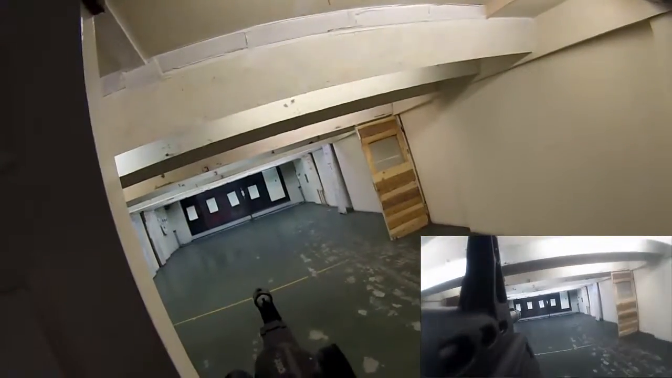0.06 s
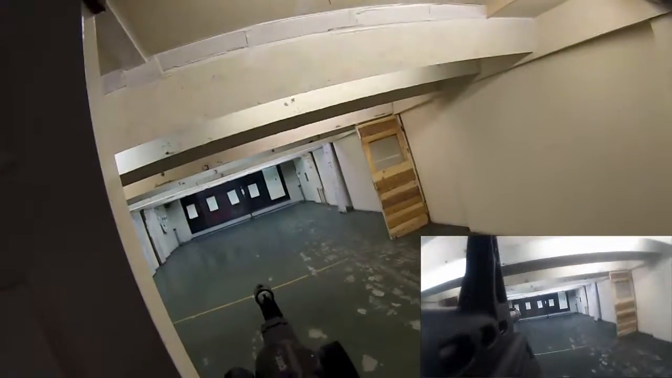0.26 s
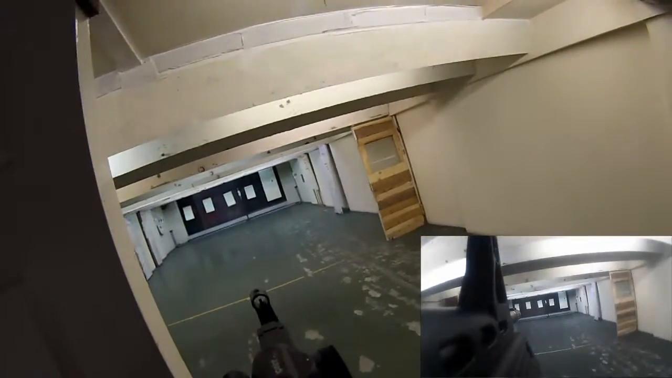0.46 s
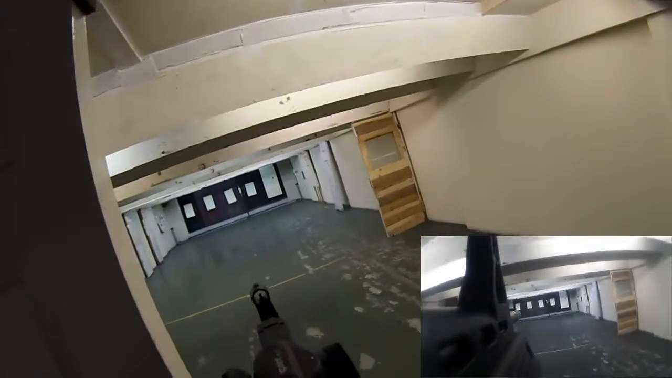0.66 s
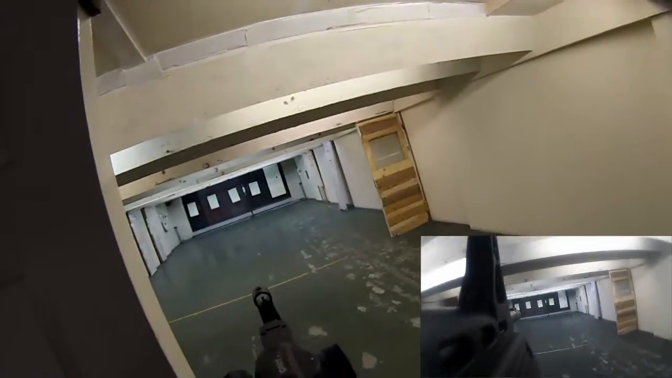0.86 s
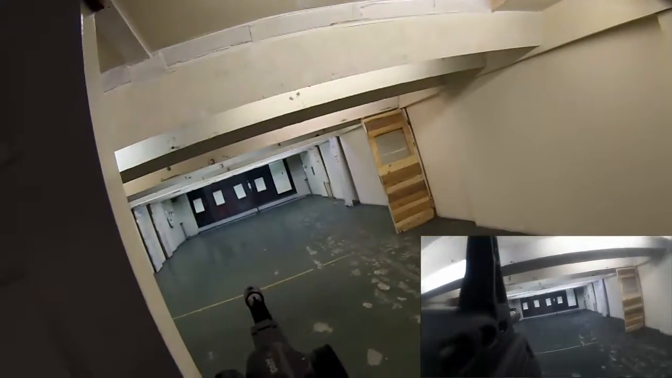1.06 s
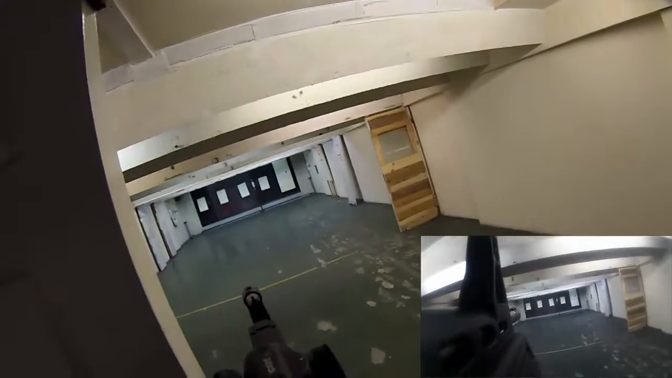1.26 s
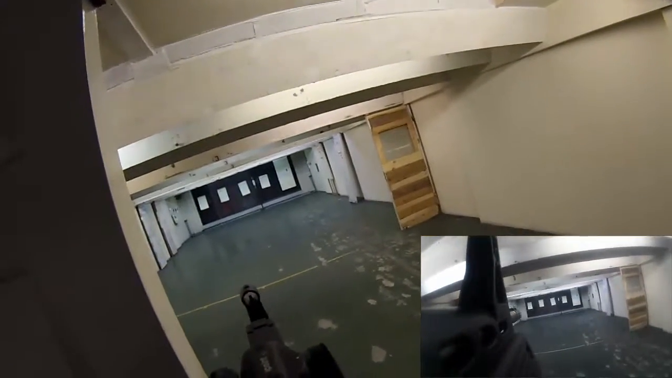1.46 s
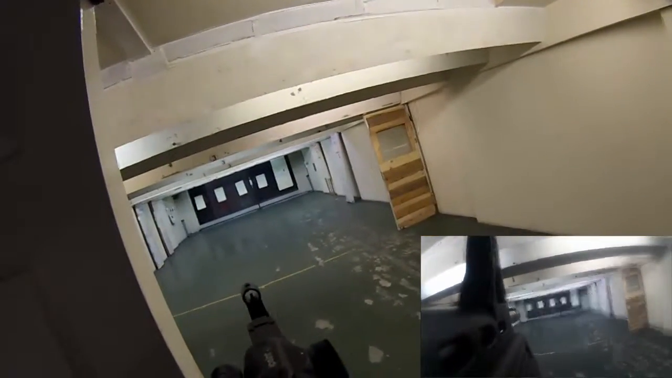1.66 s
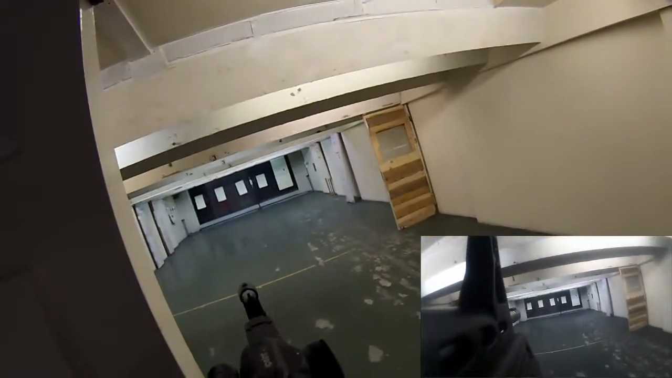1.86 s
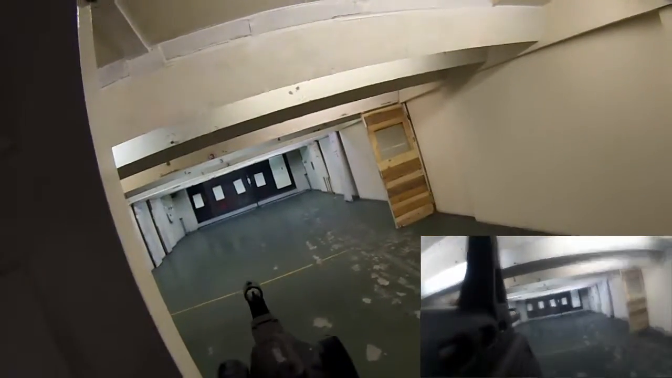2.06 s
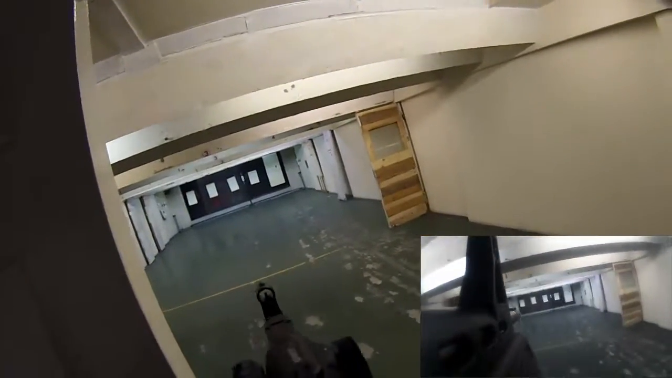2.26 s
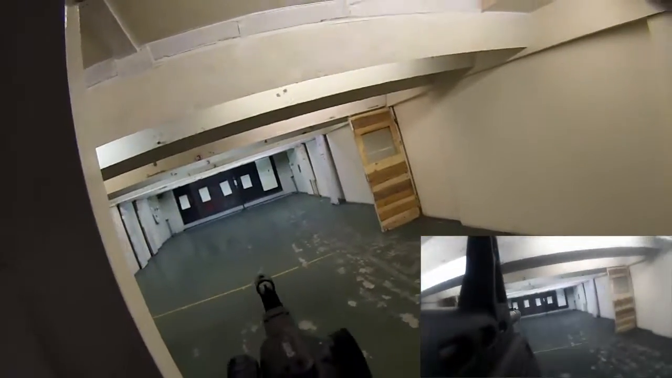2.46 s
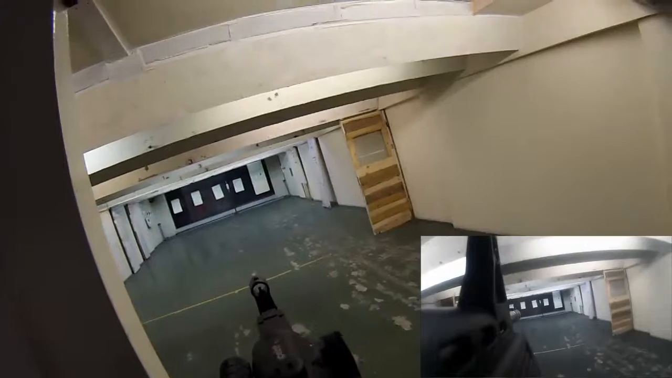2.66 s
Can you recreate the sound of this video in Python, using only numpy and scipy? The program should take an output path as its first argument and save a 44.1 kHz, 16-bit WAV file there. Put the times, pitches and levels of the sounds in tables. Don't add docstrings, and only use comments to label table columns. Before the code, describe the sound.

Four rifle shots fired in a reverberant indoor range, two spaced apart, then a heavier pair close together; sharp clicks precede them, echoes slap back, heard through a small overloaded head-worn microphone.

```python
import sys
import numpy as np
from scipy import signal
from scipy.io import wavfile
from scipy.ndimage import uniform_filter1d

SR = 44100
rng = np.random.default_rng(int(sys.argv[2]) if len(sys.argv) > 2 else 0)


def volts_from_decibels(level):
    exponent = np.asarray(level, float) / 20
    return 10 ** exponent


def dump_mix(stems):
    frames = np.atleast_2d(stems).T
    limited = np.clip(frames, -1, 1)
    pcm = np.round(limited * 32767).astype(np.int16)
    wavfile.write(sys.argv[1], SR, pcm)


N = 121275
DUCK_DB = 11

# t/s, level/dB, gain recovery/s, pressure thump level/dB
SHOTS = [
    (.201, 0, 0.19, -21.5),
    (0.7698, -1, 0.19, -20.5),
    (1.6983, 1, 0.27, -11.5),
    (2.08, 0.5, 0.26, -14.5),
]


def read(points, hz):
    f, value = np.transpose(points)
    return np.interp(np.log(hz + 1), np.log(f + 1), value)


def evened(x):
    return x / np.sqrt(np.mean(x ** 2) + 1e-20)


def add(mix, s, sound):
    part = mix[round(s * SR):][:len(sound)]
    part += sound[:len(part)]


def noise(colour_db, count, size=512):
    hop = size // 4
    frames = count // hop + 5
    hz = np.fft.rfftfreq(size, 1 / SR)[:, None]
    real, imaginary = rng.standard_normal((frames, len(hz), 2)).T
    t = np.arange(frames) * hop / SR
    spectra = (real + 1j * imaginary) * volts_from_decibels(colour_db(hz, t))
    return signal.istft(spectra, nperseg=size, noverlap=size - hop)[1][:count]


def air():
    # f/Hz, level/dB per Hz
    air_colour = [(15, -32), (25, -9), (113, -10.5), (155, 4.5), (231, -22), (293, -9), (991, -4.5),
                  (1470, -18), (14000, -31.5)]
    sound = noise(lambda hz, t: read(air_colour, hz) + 0 * t, count=N, size=1024)
    return volts_from_decibels(-60) * evened(sound)


def ticks():
    # t/s, peak level/dB, f/Hz, t60/s
    knocks = [
        (.052, -34, 1050, 0.024),
        (.13, -53, 890, 0.1),
        (.171, -26.5, 1050, .018),
        (.178, -42, 963, 0.028),
        (.1915, -13.5, 855, 0.038),
        (.1955, -17, 1000, 0.015),
        (0.763, -42, 925, .03),
        (1.686, -21.5, 760, 0.045),
        (2.024, -8, 1070, 0.022),
    ]
    out, t = np.zeros(N), np.arange(4000) / SR
    edge = signal.butter(2, [600, 1500], "bandpass", fs=SR)
    grits = rng.standard_normal((len(knocks), len(t)))
    for (s, db, hz, t60), grit in zip(knocks, grits):
        upper = np.sin(2 * np.pi * hz * t)
        lower = 0.7 * np.sin(2 * np.pi * 0.707 * hz * t)
        rough = 1.7 * signal.lfilter(*edge, grit)
        rise = np.minimum(t / .002, 1)
        add(out, s, volts_from_decibels(db - 60 * t / t60) * rise * (upper + lower + rough))
    return out


def hall_db(hz, t=0):
    # f/Hz, level/dB per Hz
    hall_colour = [(18, -45.5), (30, -28.5), (470, -7.5), (709, -1.5), (1280, -6.5), (1840, 0), (4180, -16),
                   (6810, -22.5), (14000, -31)]
    # f/Hz, width/Hz, level/dB
    housing = [(780, 74, -0.5), (1050, 600, 5), (1500, 750, -3.5), (1900, 590, -1.5), (2700, 400, -4),
               (3236, 390, 5), (4920, 1050, 4.5), (6620, 1300, 3)]
    # f/Hz, t60/s
    decay = [(40, 0.89), (120, 1.01), (250, 0.79), (500, 1.157), (900, 1.31), (2000, 1.348), (5000, 1.062),
             (14000, 0.75)]
    bumps = sum(db / (1 + (2 * (hz - f) / width) ** 2) for f, width, db in housing)
    return read(hall_colour, hz) + bumps - 60 * t / read(decay, hz)


def hall(count=66150):
    lumps = uniform_filter1d(rng.standard_normal(count), size=60)
    lumps = evened(uniform_filter1d(lumps, size=60))
    lump_db = 0.5 * lumps * np.exp(-np.arange(count) / SR / 0.1)
    tail = noise(hall_db, count=count, size=1024) * volts_from_decibels(lump_db)
    return tail / np.sqrt(np.mean(tail[:SR // 10] ** 2))


def arrivals(t, rows, grit):
    out = 0
    for at, db, hz, length, share in rows:
        u = t - at
        sag = 1 - .04 * u / length
        tone = np.sin(2 * np.pi * hz * u * sag)
        out = out + volts_from_decibels(db) * np.exp(-.5 * (u / length) ** 2) * ((1 - share) * tone + share * grit)
    return out


def blast_front(t):
    u = (t - .001) / .0012
    return volts_from_decibels(-15) * (1 - .5 * u ** 2) * np.exp(-.5 * u ** 2)


def suction(t, db):
    v = (t - .0095) / .002
    rebound = .25 * np.exp(-.5 * ((v - 3.5) / 3.0) ** 2)
    return volts_from_decibels(db) * (rebound - np.exp(-.5 * v ** 2))


def shots():
    # delay t/s, peak level/dB, f/Hz, length/s, noisy share/0-1
    near = [
        (-.0014, -18, 6600, .0005, .4),
        (.0004, -1, 3300, .00045, .35),
        (.0009, -6, 600, .0008, .1),
        (.0016, -7, 1500, .0004, .2),
        (.0045, -8, 3700, .0006, .45),
        (.0065, -11, 1150, .0012, .3),
        (.0088, 3, 2050, .0006, .3),
        (.013, -7, 1900, .0004, .2),
    ]
    # delay t/s, peak level/dB, f/Hz, length/s, noisy share/0-1
    far = [
        (.029, -11, 2600, .0003, .3),
        (.034, -15, 800, .004, .4),
        (.0385, -16, 2000, .0008, .4),
        (.087, -13, 1600, .0012, .3),
        (.0902, -6.5, 1950, .0005, .15),
        (.0925, -15, 740, .003, .3),
    ]
    alike = 0.71
    own = np.sqrt(1 - np.clip(alike, 0, 1) ** 2)
    lead = .005
    out, same = np.zeros(N), hall()
    t = np.arange(len(same)) / SR - lead

    def crack(dullness):
        return evened(noise(lambda hz, s: dullness * hall_db(hz) + 0 * s, count=len(t)))

    bright, dull = crack(.6), crack(1.1)
    build_up = np.clip(t / .007, 0, 1)
    lull = volts_from_decibels(-2.5 * (t > .017) * (t < .028))
    for s, db, _, thump_db in SHOTS:
        tail = volts_from_decibels(-9.5) * (alike * same + own * hall()) * build_up * lull
        near_grit = alike * bright + own * crack(.6)
        echoes = arrivals(t, near, near_grit) + arrivals(t, far, dull)
        direct = blast_front(t) + echoes + suction(t, thump_db)
        add(out, s - lead, volts_from_decibels(db) * (tail + volts_from_decibels(DUCK_DB) * direct))
    return out


def cases():
    # t/s, peak level/dB, low f/Hz, high f/Hz
    clinks = [
        (1.352, -50, 5800, 7600),
        (1.625, -62, 4700, 5400),
    ]
    out, t = np.zeros(N), np.arange(3000) / SR
    picks = rng.random((len(clinks), 9))
    for (s, db, low_hz, high_hz), pick in zip(clinks, picks):
        partials = [np.sin(2 * np.pi * (low_hz + p * (high_hz - low_hz)) * t + 40 * p) for p in pick]
        rise = np.minimum(t / 0.0025, 1)
        add(out, s, volts_from_decibels(db - 60 * t / 0.081) * rise * sum(partials) / 3)
    return out


def scene():
    return (air() + ticks() + shots() + cases())[None]


def gain_duck():
    # lead/s, share of full duck/0-1
    early = [
        (.004, .3),
        (.015, .8),
        (.015, .5),
        (.066, .25),
    ]
    t = np.arange(N) / SR
    ducks = []
    for (s, _, recovery, _), (lead, share) in zip(SHOTS, early):
        times = [s - lead - .008, s - lead, s - .002, s, s + recovery]
        ducks.append(np.interp(t, times, [0, share, share, 1, 0]))
    return np.max(ducks, axis=0)


def top_cut(x):
    return signal.sosfilt(signal.butter(12, 14280, fs=SR, output="sos"), x)


def record(dry):
    t = np.arange(N) / SR
    hiss = volts_from_decibels(-65) * rng.standard_normal(N) * (t > SHOTS[0][0])
    hot = np.clip(dry * volts_from_decibels(-DUCK_DB * gain_duck()) + hiss, -1, 1)
    low_pass = signal.firwin(511, 14200, window=("kaiser", 7), fs=SR)
    limited = signal.oaconvolve(hot, low_pass[None], "same")
    return top_cut(np.clip(limited, -1, 1))


dry = scene()
out = record(dry)
dump_mix(out)
```